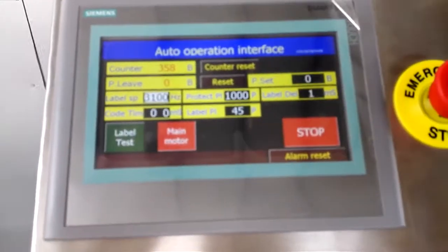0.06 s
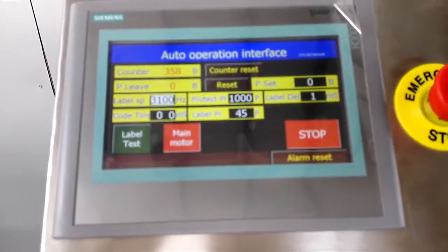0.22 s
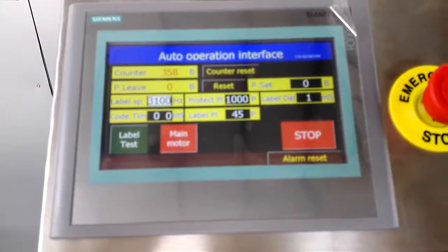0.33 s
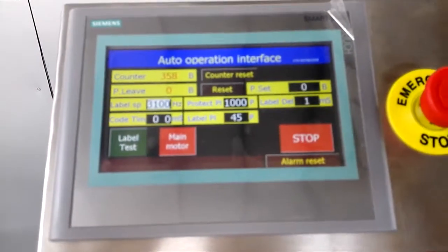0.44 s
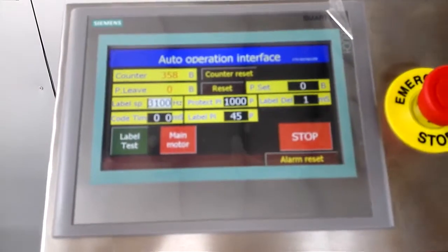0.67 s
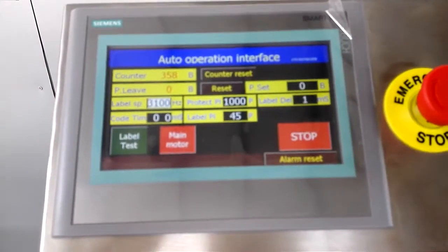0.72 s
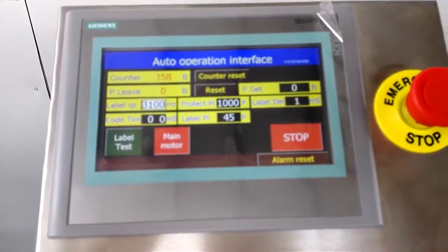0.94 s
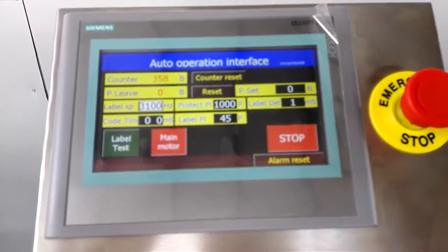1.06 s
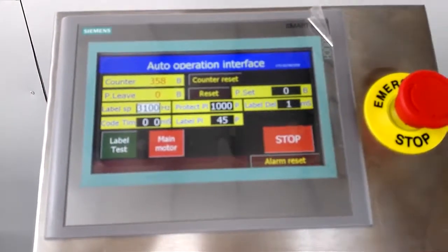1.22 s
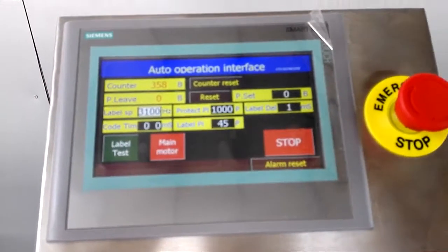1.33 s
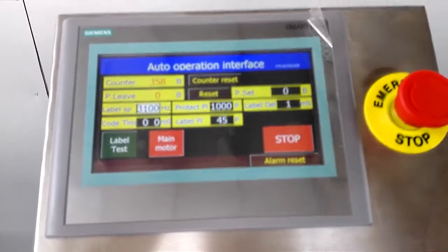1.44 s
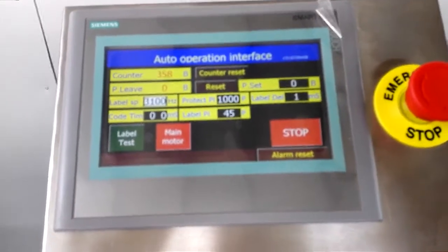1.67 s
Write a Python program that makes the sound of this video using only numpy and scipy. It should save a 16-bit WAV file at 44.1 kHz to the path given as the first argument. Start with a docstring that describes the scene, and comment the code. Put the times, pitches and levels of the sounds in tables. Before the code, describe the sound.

A machine's steel catch snaps shut at about 0.2 seconds, close on the right, loud and slightly distorted, with a quick bounce and a brief bright ring. At about 1 second it releases with a duller clack. Both echo briefly off hard workshop walls. Fans and belts rush and motors hum throughout, with faint knocks from further away between 0.5 and 1.6 seconds.

```python
"""A hard-walled workshop, with a labelling machine cycling once to the right of a stereo pair.
Motors hum and fans and belts rush throughout, with faint knocks from further down the line.
A steel catch snaps shut, bounces and rings; later it lets go and its lever gives a duller clack.
Both reach the microphones directly, then off nearby panels and the walls.
The narrow-band recorder overloads on the snap."""
import sys
import numpy as np
from scipy import signal
from scipy.fft import rfft, irfft
from scipy.io import wavfile

SR = 44100
rng = np.random.default_rng(int(sys.argv[2]) if len(sys.argv) > 2 else 0)


def int16_out(signal):
    """Quantize to a 16-bit WAV file."""
    q = np.round(np.clip(np.atleast_2d(signal).T, -1, 1) * 32767)
    wavfile.write(sys.argv[1], SR, q.astype(np.int16))


N = 74970
TIME = np.arange(N) / SR
BIN_HZ = np.arange(N // 2 + 1) * SR / N
NOISE_TOP_HZ = 6500


def from_db(db):
    """Decibels to gain."""
    return 10 ** (np.asarray(db) / 20)


def rms_one(x):
    """Scale to unit rms."""
    return x / np.sqrt(np.mean(x ** 2) + 1e-20)


def in_time(rows):
    """Read a table of (time [s], value) at every sample."""
    return np.interp(TIME, *np.transpose(rows))


def at_hz(points, hz):
    """Read a table of (frequency [Hz], value) on a log axis."""
    f, value = np.transpose(points)
    return np.interp(np.log(np.maximum(hz, 1)), np.log(f), value)


def pan(right_db):
    """Gains of the left and right microphones, right_db apart."""
    return from_db(np.array([[-.5], [.5]]) * right_db)


def drift(rate_hz):
    """A slow random wander of unit rms."""
    return rms_one(irfft(rfft(rng.standard_normal(N)) / (1 + (BIN_HZ / rate_hz) ** 2), N))


def noise(colour):
    """Two unrelated noises of one colour, each near unit rms."""
    white = rfft(rng.standard_normal((2, N)))
    return rms_one(irfft(white * from_db(at_hz(colour, BIN_HZ)) * (BIN_HZ < NOISE_TOP_HZ), N))


def bands(x):
    """Split into third-octave bands: (centre [Hz], signal)."""
    spectrum = rfft(x)
    edges = np.geomspace(18, NOISE_TOP_HZ, 27)
    return [(np.sqrt(lo * hi), irfft(spectrum * (BIN_HZ >= lo) * (BIN_HZ < hi), N))
            for lo, hi in zip(edges, edges[1:])]


def dying(start, t60):
    """An envelope that jumps to 1 at start and falls 60 dB in t60 seconds."""
    return (TIME >= start) * np.exp(-np.log(1000) * np.clip((TIME - start) / t60, 0, 10))


def fans_and_belts():
    """A rush all round the microphones: alike on both in the bass, diffuse above."""
    # spectrum of the rush (frequency [Hz], relative level [dB])
    colour = [(25, -2.5), (45, -5), (75, -5.5), (130, -5.5), (190, -8), (280, -7), (420, -9), (620, -10.5),
              (900, -5.5), (1300, -2.5), (1800, -2), (2300, -5.5), (3100, -5.5), (3900, -12.5), (4500, -12),
              (5100, -7.5), (5700, -14)]
    # balance across the pair (frequency [Hz], right minus left [dB])
    balance = [(100, 0), (200, 0), (450, -1), (750, 1), (1200, 1), (1900, 5.5), (3000, 3), (4200, 3),
               (5100, 5), (5600, 0)]
    # likeness of the two channels (frequency [Hz], correlation [0 to 1])
    likeness = [(60, .997), (120, .96), (220, .88), (400, .53), (750, .22), (1400, .25), (2700, 0),
                (5000, 0)]
    # level at the microphones (time [s], level [dB])
    level = [(0, -31), (.2, -32.5), (.5, -30), (.82, -31), (.93, -32), (1.2, -30.5), (1.45, -31),
             (1.7, -31.5)]
    flicker_db = 0.3559
    rush = 0
    for hz, (mid, side) in bands(noise(colour)):
        alike = at_hz(likeness, hz)
        stereo = np.sqrt(1 + alike) * mid + np.sqrt(1 - alike) * side * np.array([[1], [-1]])
        rush = rush + stereo * pan(at_hz(balance, hz)) * from_db(flicker_db * drift(rate_hz=15))
    return from_db(in_time(level)) * rms_one(rush)


def tone(hz, wander):
    """A sine of unit rms whose pitch strays by the fraction wander."""
    pitch_hz = hz * (1 + wander * drift(rate_hz=5.4))
    return np.sqrt(2) * np.sin(2 * np.pi * np.cumsum(pitch_hz) / SR)


def motors():
    """A low hum and the faint, wavering whines of the drives, centred between the microphones."""
    # the hum swells and fades (time [s], level [dB])
    hum_level = [(0, -56), (.3, -49.5), (.58, -43), (.89, -43.5), (1.14, -59.5), (1.34, -41), (1.54, -49.5),
                 (1.7, -43.5)]
    # whines of the drives (frequency [Hz], level [dB])
    whines = [(266, -52.5), (458, -58.5), (1405, -57), (1733, -53.5), (1884, -51)]
    flicker_db = 3.5
    hum = from_db(in_time(hum_level)) * tone(hz=102.92, wander=.012)
    return hum + sum(from_db(db + flicker_db * drift(rate_hz=5)) * tone(hz, wander=0.004658)
                     for hz, db in whines)


def crack(contacts, colour, t60):
    """Many close, quickly damped modes: a burst of noise at each contact."""
    power = sum((from_db(db) * dying(start, t60)) ** 2 for start, db in contacts)
    return noise(colour) * np.sqrt(power)


def knocks():
    """Small, dull knocks further down the line, half buried in the rush."""
    # each knock (time [s], level [dB])
    contacts = [(.508, -32.5), (.602, -40), (.762, -34), (.826, -29.5), (1.243, -26.5), (1.299, -35),
                (1.592, -25.5)]
    # spectrum of a knock (frequency [Hz], relative level [dB])
    colour = [(300, -24), (1000, -4.5), (1800, 3.5), (3000, -13), (5500, -1)]
    return pan(right_db=3.5) * crack(contacts, colour, t60=0.12)


def workshop(x, hall_db):
    """Quick reflections off the machine's panels, then the hall's tail, slower to build in the bass."""
    # spectrum of the tail (frequency [Hz], relative level [dB])
    hall_colour = [(200, 9), (450, 6), (900, 0), (2000, -1.5), (3500, 1.5), (4600, 2.5), (5200, 3.5),
                   (5800, -0.5)]
    # reverberation time, longest in the midrange (frequency [Hz], t60 [s])
    hall_t60 = [(200, 0.0081), (900, 1.3024), (2000, 0.69), (3500, .5), (5500, 0.6377)]
    panel_db, panel_build_s = -1, 0.011
    hall = 0
    for hz, band in bands(noise(hall_colour)):
        build_s = 0.017 * np.sqrt(1000 / hz)
        hall = hall + band * dying(0, at_hz(hall_t60, hz)) * (1 - np.exp(-TIME / build_s))
    panels = noise(colour=[(1, 0)]) * dying(0, t60=.17) * (1 - np.exp(-TIME / panel_build_s))
    response = (from_db(hall_db) * rms_one(hall) + from_db(panel_db) * rms_one(panels)) * .5 / np.sqrt(N)
    return pan(right_db=5) * signal.fftconvolve(x[None], response, axes=1)[:, :N]


def ring(contacts, modes):
    """Each contact sets every mode of a steel part ringing."""
    radiation_hz = 675  # small steel parts radiate little below this
    vibration = sum(from_db(db + mode_db) * dying(start, t60) * np.sin(2 * np.pi * hz * (TIME - start))
                    for start, db in contacts for hz, mode_db, t60 in modes)
    low_cut = signal.butter(2, radiation_hz, "high", fs=SR, output="sos")
    return signal.sosfilt(low_cut, vibration + 1e-18)


def at_microphones(ringing, burst, ring_left_db, hall_db):
    """Ring and crack reach the right microphone head-on, the left shaded; the room answers on both."""
    burst_left_db = -0.5
    ring_to_room_db = -31  # the ring is beamed at the pair; little of it reaches the walls
    direct = ringing * from_db([[ring_left_db], [0]]) + burst * from_db([[burst_left_db], [0]])
    return direct + workshop(burst[1] + from_db(ring_to_room_db) * ringing, hall_db)


def lever():
    """The lever falls back and chatters against its stop."""
    # a short run of contacts (time [s], relative level [dB])
    contacts = [(.9704, -6), (.9727, 1), (.9775, -4), (.9828, -7), (.9878, -8.5)]
    # ring of lever and bracket, with the contact's tick (frequency [Hz], relative level [dB], t60 [s])
    modes = [(923, -21.5, 0.043), (1043, -22.5, .05), (1143.6, -18.5, 0.086), (1658, -11.5, 0.0405),
             (2350, -24.5, 0.067), (2906, -21, .05), (3117, -22.5, .08), (3723, 2.5, 0.00153),
             (4442, -25, .035), (4724, -20.5, 0.21), (5202, -22.5, 0.078), (5760, -28, .05)]
    # spectrum of the clack's crack (frequency [Hz], relative level [dB])
    colour = [(100, -29.5), (400, -27.5), (700, -16), (1050, 2), (1600, -0.5), (2400, 4), (3700, -5),
              (4900, 2.5), (5300, -2.5), (5800, -4)]
    burst = from_db(-12) * crack(contacts, colour, t60=0.02784)
    return at_microphones(ring(contacts, modes), burst, ring_left_db=-30.5, hall_db=4.5)


def catch():
    """The steel catch snaps shut and bounces, with a bright ring."""
    # the strike and two bounces (time [s], relative level [dB])
    contacts = [(.2306, -2), (.2455, -4.5), (.2512, -16.5)]
    # ring of the catch; the close pair near 5 kHz beats (frequency [Hz], relative level [dB], t60 [s])
    modes = [(1904.6, -11.5, 0.047), (2130, -23.5, 0.046), (2532, -18, .06), (2834, -10, 0.076),
             (4060, -17, 0.021), (5072.6, -2.5, .06), (5116.7, -2, .06), (5264, -15, 0.074)]
    # spectrum of the snap's crack (frequency [Hz], relative level [dB])
    colour = [(60, -29), (250, -8), (450, -6), (700, -11.5), (1100, 2.5), (1800, 0), (2800, 6.5),
              (3900, -2), (4600, 0.5), (5150, 4), (5800, 1)]
    burst = from_db(-10) * crack(contacts, colour, t60=0.05195)
    return at_microphones(ring(contacts, modes), burst, ring_left_db=-20.5, hall_db=5)


def scene():
    """The snap and the clack on the right, over the running machinery."""
    return catch() + lever() + knocks() + fans_and_belts() + motors()


def record(dry):
    """The recorder passes a narrow band, clips at full scale, and loses the very top."""
    band_edge_hz, cutoff_hz = 5640, 16000
    hz = np.arange(N + 1) * SR / (2 * N)
    passband = 1 / np.sqrt(1 + (hz / band_edge_hz) ** 220)
    narrow = irfft(rfft(dry, 2 * N) * passband, 2 * N)[:, :N]
    clipped = np.clip(narrow, -1, 1)
    return signal.sosfilt(signal.cheby2(12, 70, cutoff_hz, fs=SR, output="sos"), clipped)


dry = scene()
out = record(dry)
int16_out(out)
```